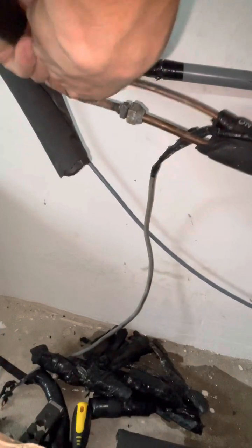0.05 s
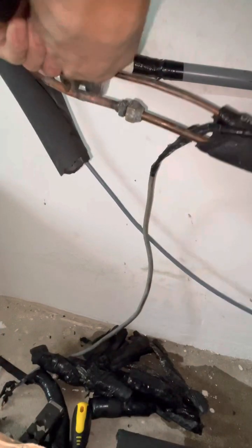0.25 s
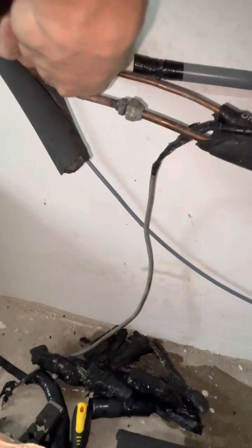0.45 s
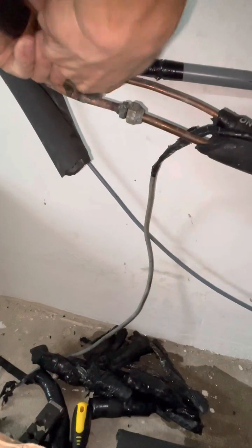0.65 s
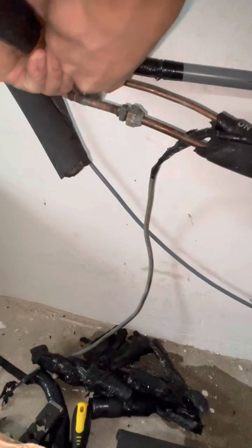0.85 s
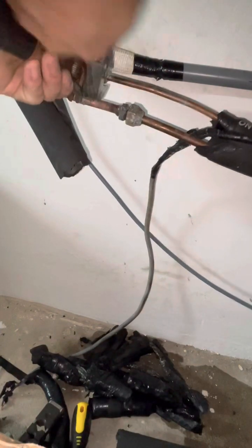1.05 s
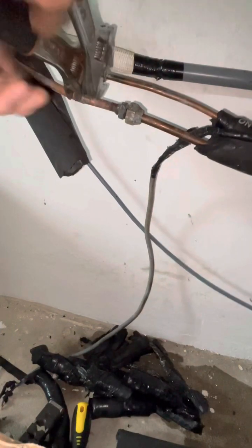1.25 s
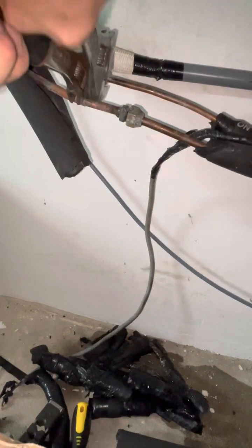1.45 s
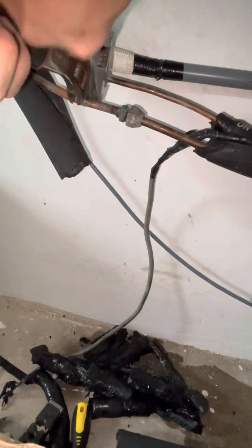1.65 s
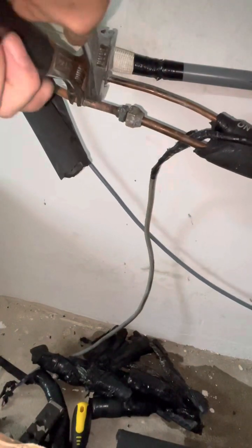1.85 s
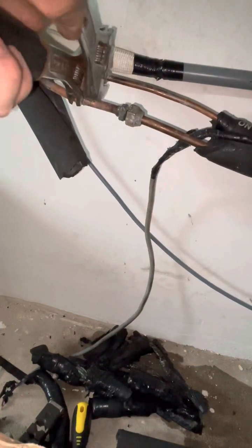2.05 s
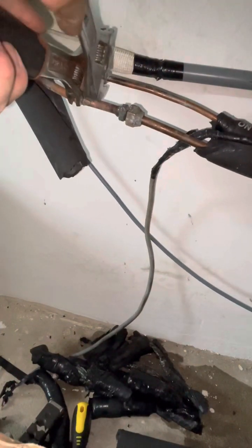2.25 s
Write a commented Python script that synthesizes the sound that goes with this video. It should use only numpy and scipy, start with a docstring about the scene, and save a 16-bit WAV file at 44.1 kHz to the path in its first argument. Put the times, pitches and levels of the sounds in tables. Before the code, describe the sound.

A steel flaring tool clanks sharply on copper pipe, with a brief scrape of its screw. Two dull knocks follow, then a few dry ticks and a soft hiss, close to a stereo microphone in a small hard room.

```python
"""Steel clanks ring out close to a stereo pair in a small hard room: a flaring tool, worked by hand
on a copper pipe. Its screw scrapes in tiny slips, the loose yoke clanks against the clamp bar again,
and a few dull knocks and dry ticks follow. A faint whistle wanders, a soft hiss swells as the grip
shifts, and a low rumble and room tone lie underneath."""
import sys
import numpy as np
from scipy import signal
from scipy.fft import rfft, irfft, next_fast_len
from scipy.io import wavfile
from scipy.ndimage import uniform_filter1d, minimum_filter1d

SR = 44100
rng = np.random.default_rng(int(sys.argv[2]) if len(sys.argv) > 2 else 0)


def waveform_to_disk(signal):
    """Save audio, clipped to [-1, 1], as 16-bit WAV at the path in sys.argv[1]."""
    frames = np.transpose(np.atleast_2d(signal))
    scaled = np.clip(frames, -1, 1) * 32767
    samples = np.round(scaled).astype(np.int16)
    wavfile.write(sys.argv[1], SR, samples)


N = 105840
T = np.arange(N) / SR


def clanks():
    """The yoke rattles on the clamp bar, each contact with its own ping; it is already ringing at 0 s."""
    # steel on steel: start_s, level_db, bright_hz, chatter_decay_s, ping_db, tuning_ratio, loose_db
    contacts = [(-.034, -2, 3000, 0.0022, -18, 1, 0), (-.025, -11.5, 570, 0.0027, -32.5, 1, -5.5),
                (-.015, -9, 8820, .001, -15.5, 1.01, 0.5), (.2345, -8, 4840, 0.0017, -25, 0.94, 1.5),
                (.2353, -6, 3143, 0.0014, -17.5, 1.2, -2), (0.237, 1.5, 1160, 0.0024, -27.5, 1.055, 1),
                (0.2376, -6.5, 327, 0.0059, -26, 1, -6.5), (0.2385, 1.5, 6656, 0.0017, -17, 1.02, 1),
                (.2398, -1, 8600, 0.0028, -13.5, 1, -3), (0.2411, -11, 4850, .0017, -15.5, 1.1, -1.5),
                (.3279, -5, 7800, 0.00064, -34.5, .97, 0), (.3287, -17, 2947, 0.0023, -31.5, .97, 14),
                (.3373, -20.5, 4400, 0.0069, -53, .97, 13)]
    lead_s = .05
    lead = round(lead_s * SR)
    out = np.zeros(lead + N)
    for s, db, hz, decay_s, ping_db, tuning, loose_db in contacts:
        add(out, lead_s + s, amp(db) * steel(contact(.1, decay_s), hz, tuning, loose_db))
        add(out, lead_s + s, amp(ping_db) * ping(hz, rise_s=.0014))
    return placed(out, wet_db=-.5, pan_db=.5)[:, lead:]


def steel(force, bright_hz, tuning=1, loose_db=0, ring_db=-16):
    """Driven steel clatters; its modes ring hard and briefly while pressed, then linger faintly."""
    # modes of the tool: pitch_hz, level_db, pressed_t60_s, free_ring_db
    modes = [(527, -20, 0.11, -13.5), (683, -15.5, .02, -12.5), (845, -17.5, 0.016, -18.5),
             (1030, -15.5, .019, -19.5), (1240, -11.5, .015, -15), (1373, -10, 0.026, -13.5),
             (1987, -6.5, .01, -16), (2270, -15, 0.031, -15), (2954, -7.5, .016, -10.5),
             (3115, -8.5, 0.016, -21), (3390, -13, 0.01, -22), (4350, -15.5, .015, -15.5),
             (4640, -9.5, 0.015, -20), (4965, -7.5, 0.013, -21.5), (6800, -11.5, 0.016, -23),
             (9020, -9, .012, -29.5)]
    # crowded, quickly damped modes of bar and yoke: frequency_hz, gain_db
    clatter_body = [(120, 6), (230, 9.5), (380, 7), (600, 5.5), (950, 7), (1600, -0.5), (2500, 0),
                    (3600, 1.5), (4200, -1), (5800, -0.5), (7600, 1), (8600, 6.5), (10200, 4), (11500, -8)]
    free_t60_s, clatter_decay_s, crack_db = .11, .0031, -4
    t = T[:SR // 2]
    ring = np.zeros(len(t))
    for k, (hz, db, t60, free_db) in enumerate(modes):
        pressed = amp(db - 60 * t / t60)
        free = amp(db + free_db + loose_db - 60 * t / free_t60_s)
        ring += (-1) ** k * np.sin(2 * np.pi * tuning * hz * t) * (pressed + free)
    clatter = rng.standard_normal(len(t)) * np.exp(-t / clatter_decay_s)
    clatter /= np.linalg.norm(clatter)
    clatter[0] += amp(crack_db)
    response = amp(ring_db) * ring + colour(clatter, lambda f: read(clatter_body, f))

    def tone_db(f):
        off_peak_db = np.minimum(3 * np.log2((f + 1) / bright_hz) ** 2, 10)
        band_loss_db = 10 * np.log10(1 + (f / 10600) ** 40 + (170 / (f + 1)) ** 4)
        return -off_peak_db - band_loss_db
    return colour(signal.fftconvolve(force, response)[:len(force)], tone_db)


def contact(chatter, decay_s, size=16384):
    """One push followed by dying chatter."""
    push = chatter * rng.standard_normal(size) * np.exp(-T[:size] / decay_s)
    push[0] = 1
    return push


def ping(hz, rise_s, size=2048):
    """One heavily damped pitch that swells and dies."""
    swell = T[:size] / rise_s
    return (swell * np.exp(1 - swell)) ** 2 * np.sin(2 * np.pi * hz * T[:size])


def knocks():
    """Padded blows of the tool against pipe and hand: a short scuff and no ring."""
    # dull blows: start_s, level_db, treble_corner_hz, scuff_decay_s
    blows = [(0.4208, -12.5, 1120, 0.0091), (0.4241, -22.5, 2000, 0.0085), (0.6371, -12, 3630, 0.0019),
             (0.6408, -12, 1400, 0.0061), (.643, -27, 403, 0.019), (0.7473, -41, 5460, .003),
             (.880, -43, 1570, 0.013), (1.532, -26, 870, 0.012), (2.284, -42, 983, 0.01)]
    # body of a knock: frequency_hz, gain_db
    body = [(60, -29), (180, -26), (290, 6.5), (500, -0.5), (750, 1), (1050, 3.5), (1400, -2), (1950, 5),
            (2550, 2), (3200, 10.5), (4200, -5), (5200, 7.5), (6300, -8.5), (8000, 4.5), (11000, -45)]
    out = np.zeros(N)
    for s, db, corner_hz, scuff_s in blows:
        force = contact(.21, scuff_s)
        knock = colour(force, lambda f: read(body, f) - 10 * np.log10(1 + (f / corner_hz) ** 4.7))
        add(out, s, amp(db) * knock)
    return out


def scrapes(slips_per_s=1600):
    """Dense small slips of the thread rasp and weakly ring the steel."""
    # strokes of the screw: start_s, length_s, first_db, last_db, bright_hz
    strokes = [(0.127, .056, -37, -29.5, 2900), (0.187, 0.051, -47.5, -37, 1299)]
    # broad rasp: frequency_hz, gain_db
    rasp = [(100, -5), (200, 1), (330, 6), (600, 1.5), (900, 4), (1400, 15), (2000, -4.5), (3000, 2),
            (4000, -11), (4850, 2), (5600, -11.5), (8000, -17), (12000, -30.5)]
    t = T[:SR // 2]
    out = np.zeros(N)
    for s, length, first_db, last_db, hz in strokes:
        slips = rng.standard_normal(len(t)) * (rng.random(len(t)) < slips_per_s / SR) * (t < length)
        slips *= amp(np.interp(t, [0, length], [first_db, last_db]))
        add(out, s, steel(slips, hz, ring_db=-18) + colour(slips, lambda f: read(rasp, f)))
    return out


def ticks(rise_cycles=2, bounce_s=.00252, bounce_db=-14):
    """The screw ticks, and a hollow ring joins one knock: each a damped pitch over a broad snap, with a small
    bounce."""
    # dry ticks, and one hollow ring under a knock: start_s, level_db, pitch_hz, relative_snap_db
    clicks = [(1.1007, -29.5, 3410, 7.5), (1.344, -45, 2820, 11), (1.531, -43.5, 826, -11),
              (1.7601, -21.5, 3235, 0)]
    # broad snap: frequency_hz, gain_db
    snap = [(100, -11), (400, -3), (1000, 1.5), (1500, -3.5), (2300, 3.5), (3000, -0.5), (4300, -0.5),
            (5600, -2.5), (8000, -12), (12000, -37)]
    out = np.zeros(N)
    for s, db, hz, snap_db in clicks:
        click = amp(db) * ping(hz, rise_cycles / hz)
        add(out, s, click)
        add(out, s, amp(db + snap_db) * colour(contact(.12, decay_s=.011), lambda f: read(snap, f)))
        add(out, s + bounce_s, amp(bounce_db) * click)
    return out


def rub(slips_per_s=2100, uneven_db=3, catch_s=.04):
    """Tiny slips of the turning screw excite a few resonances, unevenly as the thread catches and frees."""
    # rubbed resonances: pitch_hz, width_hz, gain_db
    modes = [(870, 81, -0.5), (2570, 170, -5.5), (4702, 290, -3), (5300, 100, -8.5), (6900, 160, -11)]
    # light friction: time_s, level_db
    level = [(0, -96), (1.25, -92.5), (1.32, -69.5), (1.5, -65.5), (1.7, -69.5), (1.88, -74), (2.05, -86),
             (2.4, -93.5)]
    catch = uniform_filter1d(rng.standard_normal(N), round(catch_s * SR))
    catch = unit(uniform_filter1d(catch, round(catch_s * SR / 2)))
    slips = rng.standard_normal(N) * (rng.random(N) < slips_per_s / SR) * amp(uneven_db * catch)

    def resonance_db(f):
        power = sum(amp(db) ** 2 / (1 + (2 * (f - hz) / width) ** 2) for hz, width, db in modes)
        return 10 * np.log10(power)
    return unit(colour(slips, resonance_db)) * amp(curve(level))


def hiss():
    """A soft hiss swells as the grip shifts."""
    spectrum = [(300, -18), (900, -13), (1800, -12.5), (2800, -5.5), (4100, -5.5), (4900, 3.5),
                (5500, -0.5), (6300, 1.5), (7500, -0.5), (10000, -1.5), (11500, -7), (12600, -10.5),
                (13500, -35)]  # bright noise: frequency_hz, gain_db
    level = [(0, -66), (.5, -74.5), (.9, -74), (1.01, -71), (1.07, -57), (1.16, -58.5), (1.22, -53.5),
             (1.32, -54.5), (1.38, -63), (1.48, -60), (1.72, -65), (1.901, -61.5), (2.05, -68.5),
             (2.24, -73.5), (2.4, -82)]  # its swells: time_s, level_db
    return noise(spectrum) * amp(curve(level))


def whistle(width_hz=90):
    """A faint, thin band of noise wanders in pitch."""
    glide = [(.66, 7120, -90), (.73, 7100, -75), (.79, 7200, -74), (.85, 7850, -79), (.92, 7760, -73),
             (.98, 7040, -75), (1.04, 6500, -88.5)]  # path of the whistle: time_s, pitch_hz, level_db
    fuzz = unit(signal.lfilter([1], [1, -np.exp(-np.pi * width_hz / SR)], rng.standard_normal(N)))
    sounding = (T > glide[0][0]) & (T < glide[-1][0])
    tone = np.sin(2 * np.pi * np.cumsum(curve(glide)) / SR)
    return sounding * amp(curve(glide, column=2)) * fuzz * tone


def rumble():
    """A low rumble rises and falls under the tool."""
    spectrum = [(12, -43), (27, -13), (38, -25.5), (48, -14), (59, 5.5), (76, -7), (105, -3.5),
                (130, -17.5), (165, -15.5), (225, -36), (300, -24.5), (600, -50.5), (2000, -75)]  # deep noise: frequency_hz, gain_db
    level = [(0, -55), (.3, -48.5), (.44, -50.5), (.53, -46), (.63, -49.5), (.75, -52), (0.949, -53),
             (1.09, -49.5), (1.2, -52), (1.42, -55), (1.55, -51), (1.8, -54.5), (2.15, -53), (2.25, -53.5),
             (2.4, -58)]  # its drift: time_s, level_db
    return noise(spectrum) * amp(curve(level))


def room_tone():
    """Quiet, broad noise that falls away near the end."""
    spectrum = [(40, -11), (200, 3), (450, 0), (850, -1.5), (1300, -11), (2000, -10.5), (4000, -12),
                (8000, -23.5), (13000, -45)]  # air of the room: frequency_hz, gain_db
    level = [(0, -61.5), (1, -68.5), (1.6, -65), (1.899, -64.5), (2.1, -79), (2.4, -81.5)]  # its fade: time_s, level_db
    return noise(spectrum) * amp(curve(level))


def placed(x, wet_db, pan_db):
    """A source close to the microphones, its midrange leaning right, with its share of the room."""
    lean = [(200, 0.5), (600, -4), (1200, -3), (2100, -2.5), (3000, 3.5), (4000, -2), (5000, 2),
            (8000, 0.5)]  # balance of the direct sound: frequency_hz, left_minus_right_db
    direct = np.array([colour(x, lambda f: side * (read(lean, f) + pan_db) / 2) for side in (1, -1)])
    return direct + amp(wet_db) * room(x)


def room(x, early_db=-9, early_decay_s=.017, tail_delay_s=.0056):
    """Quick reflections from the near wall and floor, then the tail of the room."""
    reverb = [(100, -5, .5), (260, 0, 0.24), (1000, 1, 0.23), (2000, -1.5, 0.28), (3220, -7, 0.21),
              (5070, -13.5, 0.42), (9050, -19, 0.39)]  # tail of the small room: frequency_hz, level_db, t60_s
    t = T[:SR]
    hz, at, bands = signal.stft(rng.standard_normal((2, SR)), SR, nperseg=256)
    t60 = read(reverb, hz, column=2)[:, None]
    bands *= amp(read(reverb, hz)[:, None] - 60 * at / t60)
    bands *= np.sqrt(2 * np.log(1000) / (t60 * SR))  # a longer decay adds no energy
    tail = signal.istft(bands, SR, nperseg=256)[1][:, :SR] * (t > tail_delay_s)
    early = rng.standard_normal((2, SR)) * (rng.random((2, SR)) < .1)
    early *= np.exp(-t / early_decay_s) * (t > .001)
    response = diffuse(tail + amp(early_db) * unit(early) / np.sqrt(SR))
    return signal.fftconvolve(x[None], response, axes=1)[:, :len(x)]


def noise(spectrum):
    """Diffuse noise of rms 1."""
    gain = amp(read(spectrum, np.fft.rfftfreq(N, 1 / SR)))
    return unit(diffuse(irfft(rfft(rng.standard_normal((2, N))) * gain, N)))


def diffuse(pair):
    """Two unrelated signals become left and right of a diffuse field."""
    spread = [(40, -28), (110, -18.5), (250, -7), (600, 2), (1200, 1.5), (3000, -2), (5000, 1), (7000, -8),
              (8600, -7), (9400, -32), (10500, -45.5)]  # stereo width: frequency_hz, side_minus_mid_db
    n = pair.shape[1]
    width = amp(read(spread, np.fft.rfftfreq(n, 1 / SR)))
    mid, side = rfft(pair) / np.sqrt(1 + width ** 2)
    return irfft([mid + width * side, mid - width * side], n)


def colour(x, db_at, size=4096):
    """Causal filter with the gain db_at(Hz)."""
    hz = abs(np.fft.fftfreq(size, 1 / SR))
    log_gain = np.log(amp(np.maximum(db_at(hz), -100)))
    taps = np.fft.ifft(np.exp(np.conj(signal.hilbert(log_gain)))).real[:size // 2]
    return signal.fftconvolve(x, taps)[:len(x)]


def amp(db):
    """Decibels to gain."""
    return 10 ** (np.asarray(db) / 20)


def unit(x):
    """Scales to rms 1."""
    return x / np.sqrt(np.mean(x ** 2) + 1e-20)


def read(points, hz, column=1):
    """A column of a spectrum table on a log-frequency axis."""
    p = np.transpose(points)
    return np.interp(np.log(hz + 1), np.log(p[0] + 1), p[column])


def curve(points, column=1):
    """A column of a time table at every sample."""
    p = np.transpose(points)
    return np.interp(T, p[0], p[column])


def add(mix, s, sound):
    """Mixes a sound in at time s."""
    part = mix[max(round(s * SR), 0):][:len(sound)]
    part += sound[:len(part)]


def scene():
    """The tool up close, with hiss, rumble, room tone and whistle behind it."""
    tool = clanks() + placed(scrapes() + rub(), wet_db=2, pan_db=2.5)
    tool += placed(knocks(), wet_db=-1, pan_db=.5) + placed(ticks(), wet_db=-1, pan_db=-1)
    return tool + hiss() + rumble() + room_tone() + whistle()


def record(dry):
    """Left and right fall into opposite phase in the treble; a limiter and a low-pass follow."""
    channel_phase = [(100, 0), (3000, 0.8), (5000, 0.44), (6800, 1.47), (8300, 2.5), (9300, 3.5),
                     (10200, np.pi), (16000, np.pi)]  # phase between left and right: frequency_hz, phase_rad
    ceiling, hold_s, edge_hz = .32, .004, 13200
    size = next_fast_len(N + 4096)
    phase = read(channel_phase, np.fft.rfftfreq(size, 1 / SR))
    pair = irfft(rfft(dry, size) * np.exp(.5j * np.array([phase, -phase])), size)[:, :N]
    hold = int(hold_s * SR)
    gain = ceiling / np.maximum(abs(pair).max(0), ceiling)
    limited = pair * uniform_filter1d(minimum_filter1d(gain, hold), hold)
    lowpass = signal.firwin(255, edge_hz, window=("kaiser", 9), fs=SR)
    return signal.oaconvolve(limited, lowpass[None], "same")


dry = scene()
out = record(dry)
waveform_to_disk(out)
```